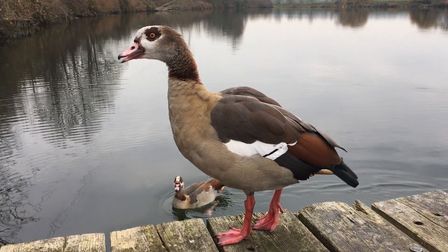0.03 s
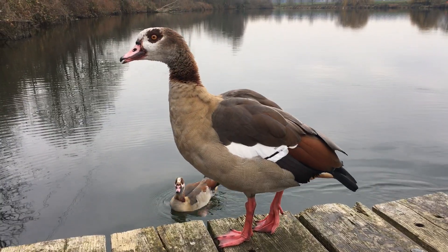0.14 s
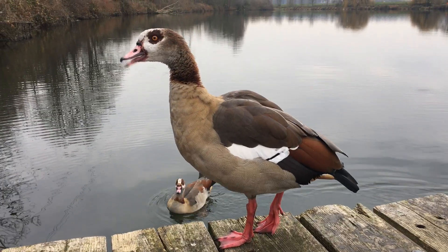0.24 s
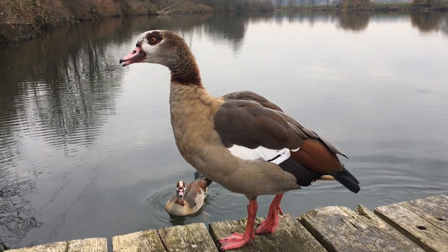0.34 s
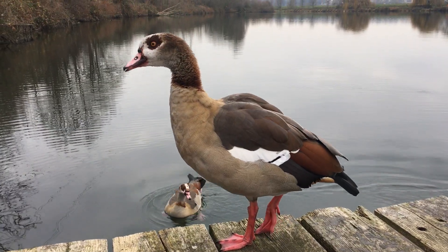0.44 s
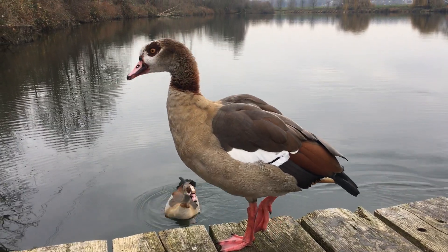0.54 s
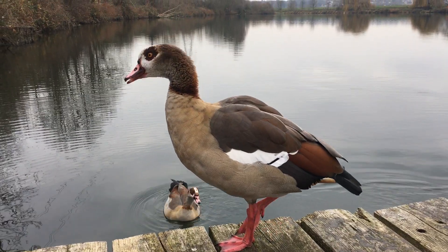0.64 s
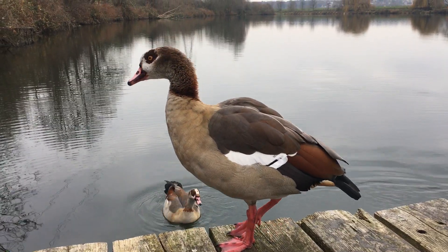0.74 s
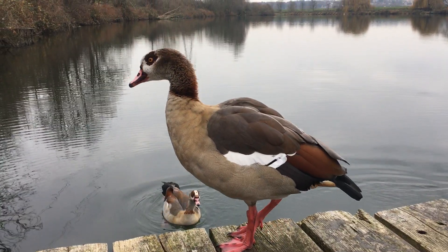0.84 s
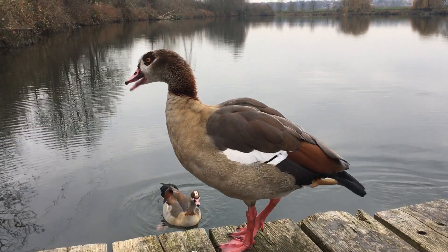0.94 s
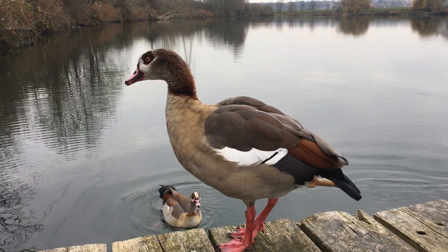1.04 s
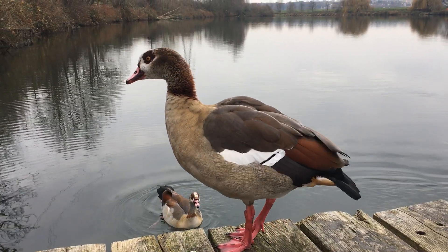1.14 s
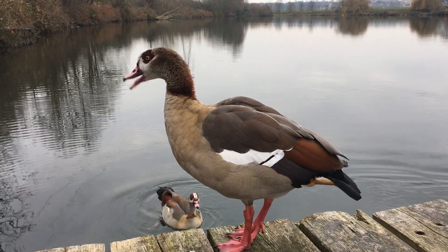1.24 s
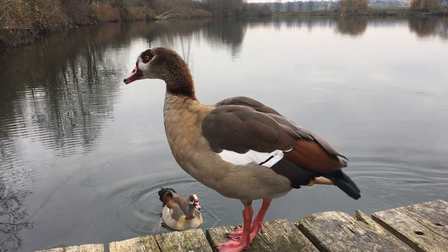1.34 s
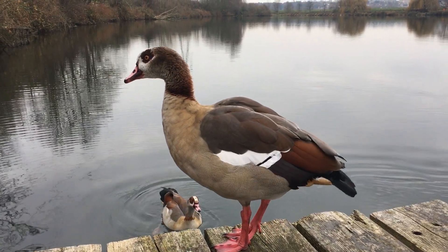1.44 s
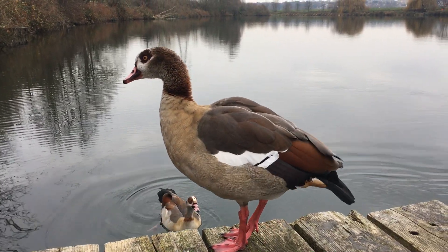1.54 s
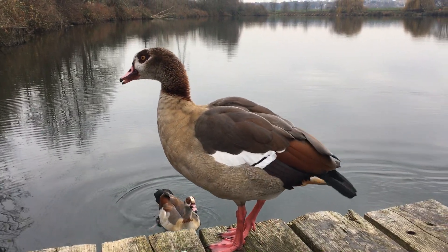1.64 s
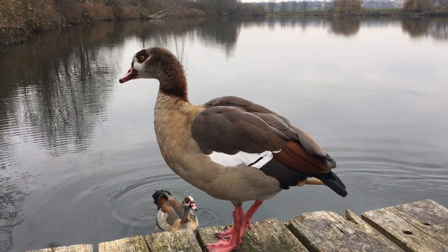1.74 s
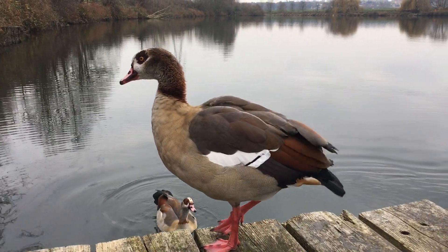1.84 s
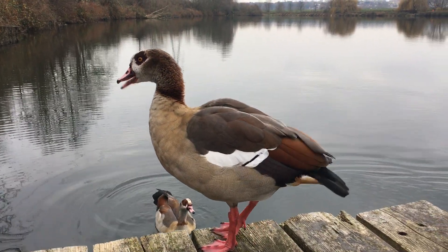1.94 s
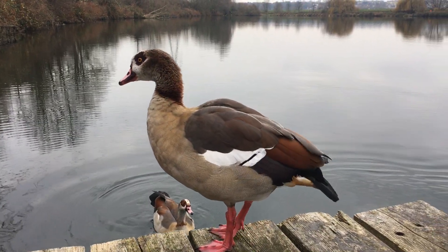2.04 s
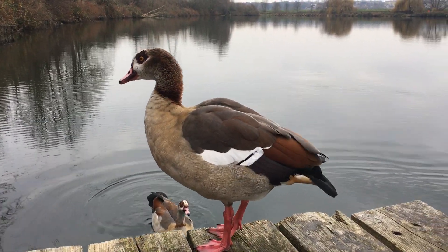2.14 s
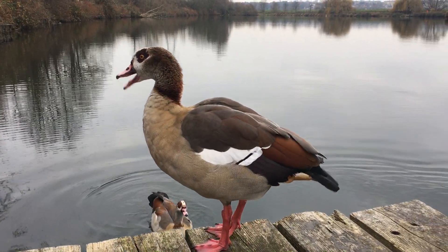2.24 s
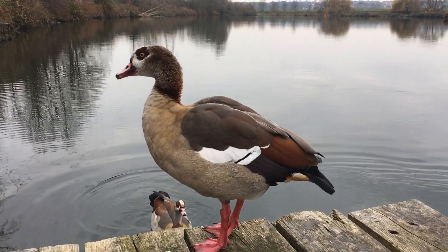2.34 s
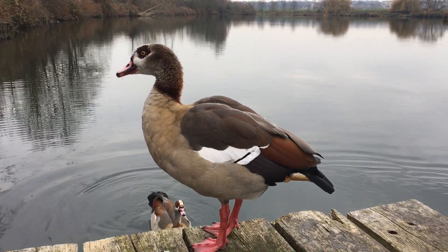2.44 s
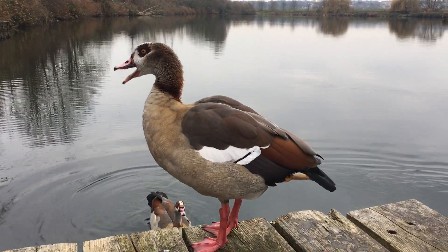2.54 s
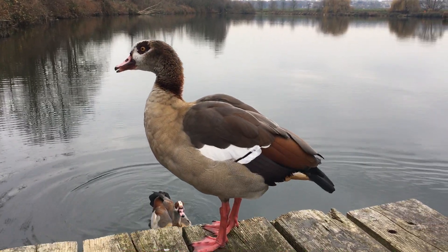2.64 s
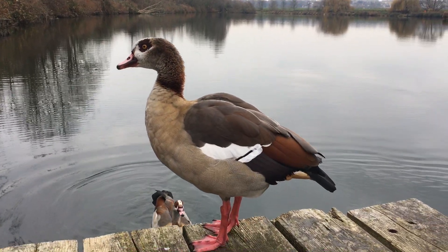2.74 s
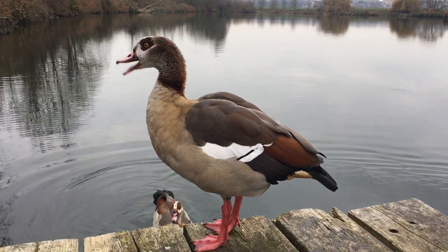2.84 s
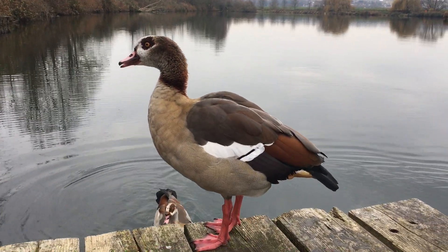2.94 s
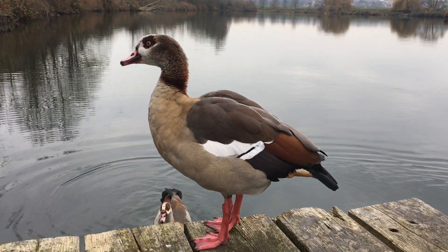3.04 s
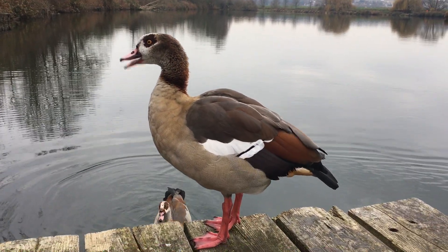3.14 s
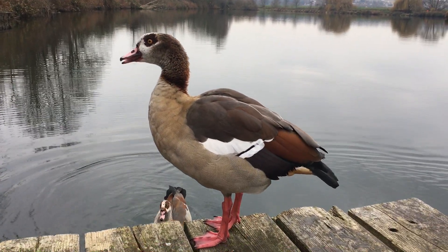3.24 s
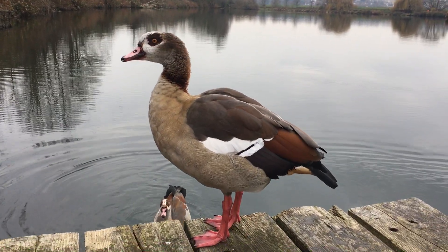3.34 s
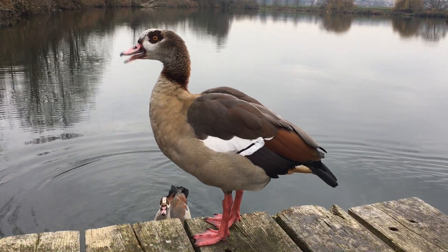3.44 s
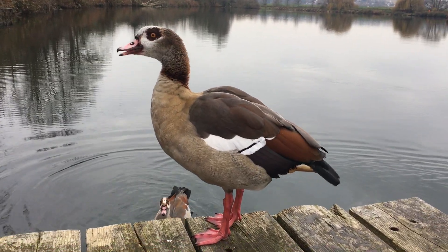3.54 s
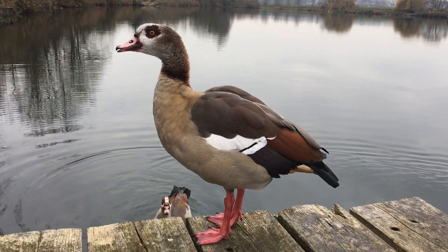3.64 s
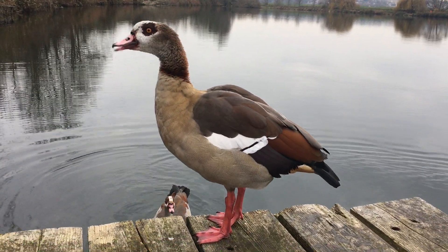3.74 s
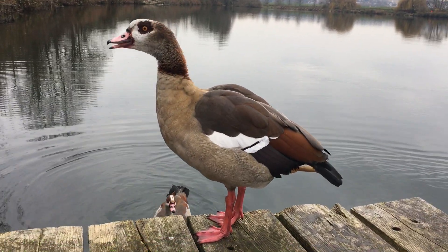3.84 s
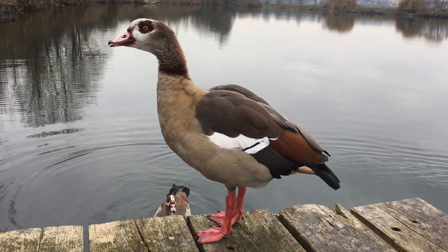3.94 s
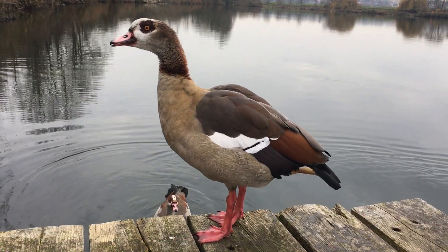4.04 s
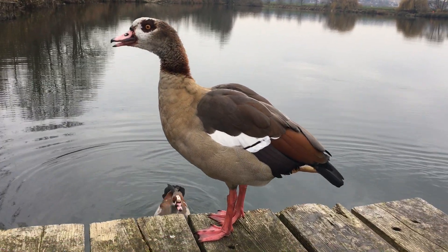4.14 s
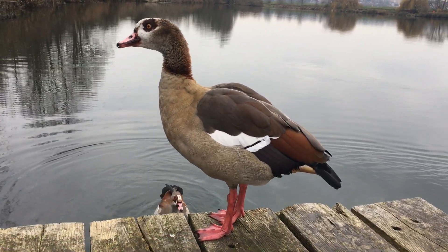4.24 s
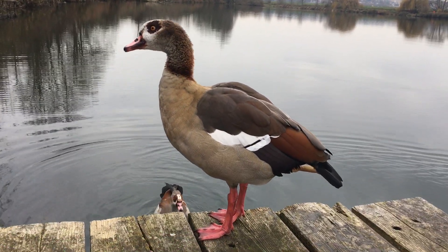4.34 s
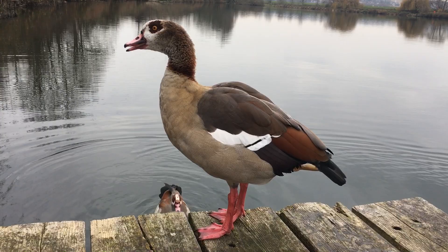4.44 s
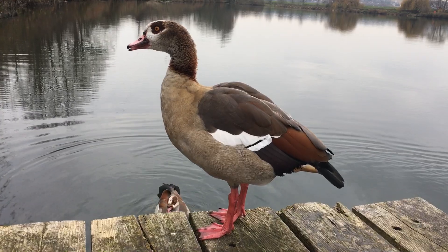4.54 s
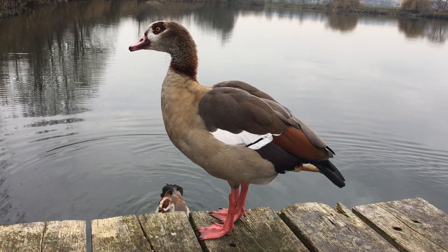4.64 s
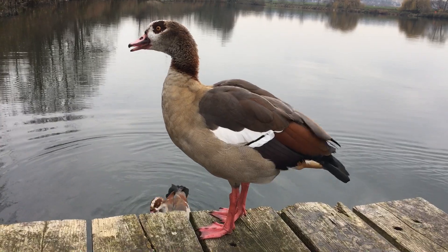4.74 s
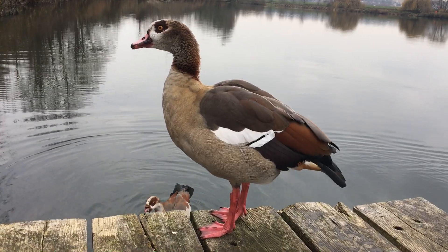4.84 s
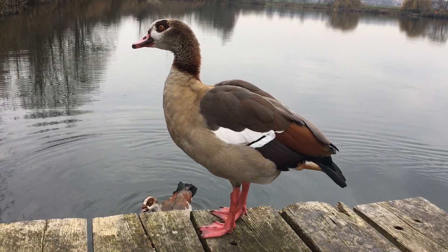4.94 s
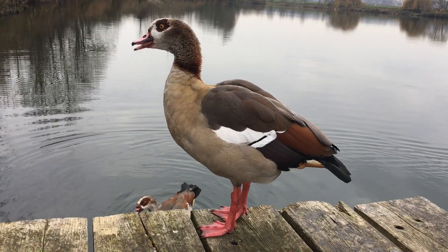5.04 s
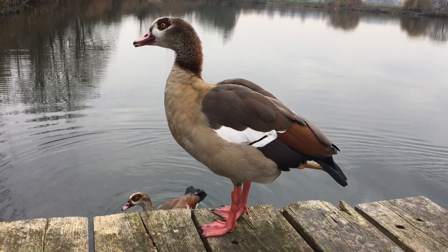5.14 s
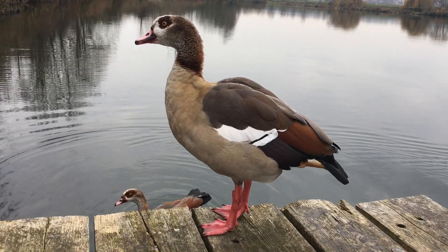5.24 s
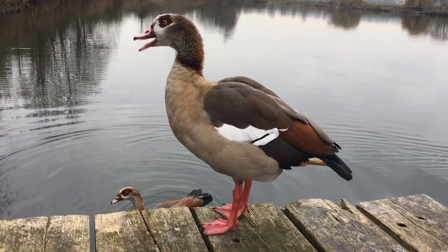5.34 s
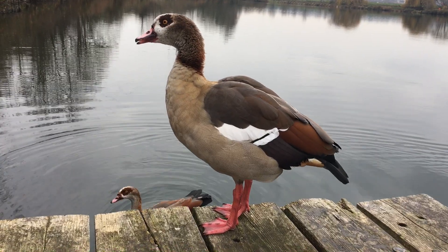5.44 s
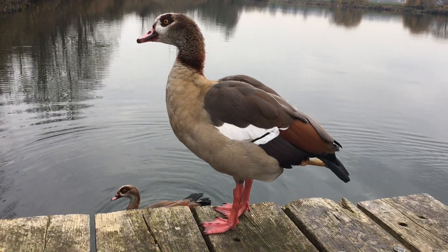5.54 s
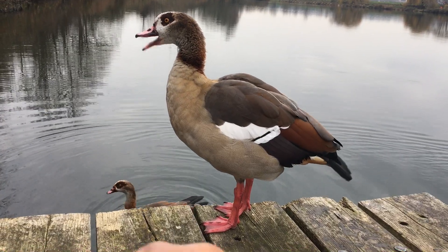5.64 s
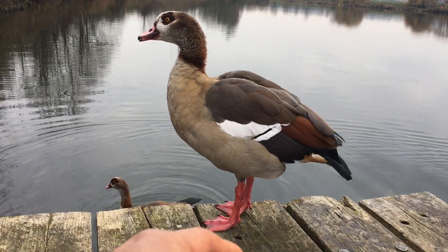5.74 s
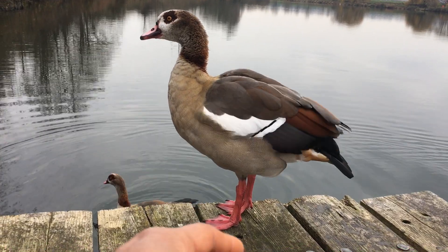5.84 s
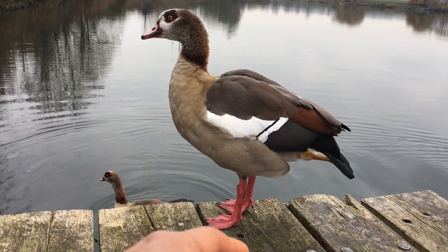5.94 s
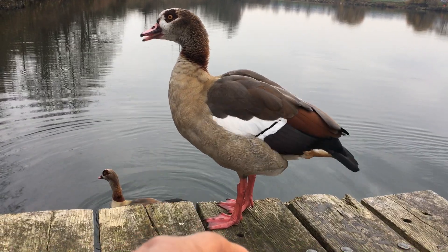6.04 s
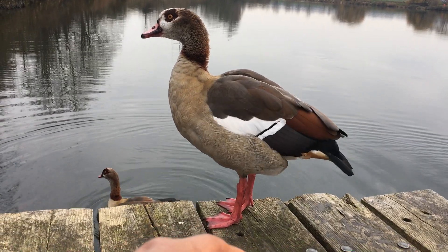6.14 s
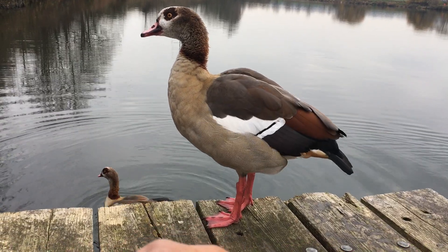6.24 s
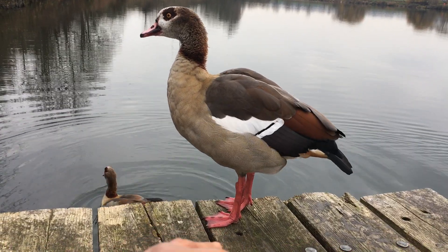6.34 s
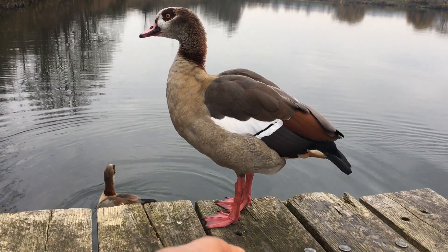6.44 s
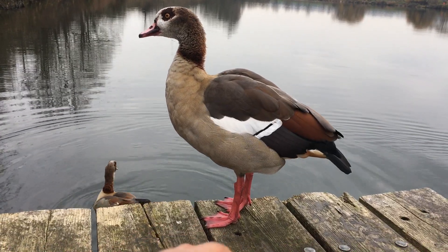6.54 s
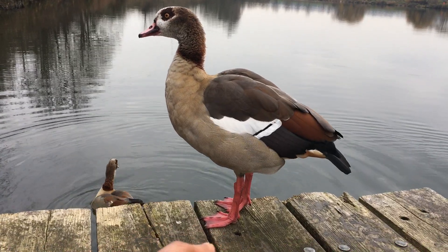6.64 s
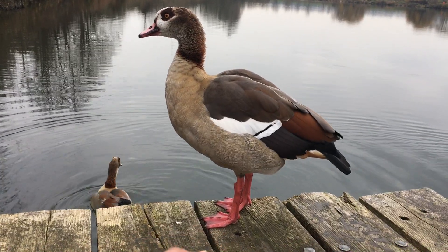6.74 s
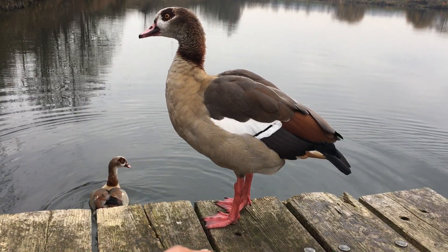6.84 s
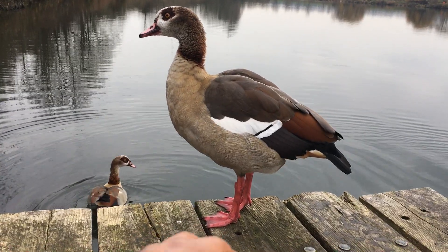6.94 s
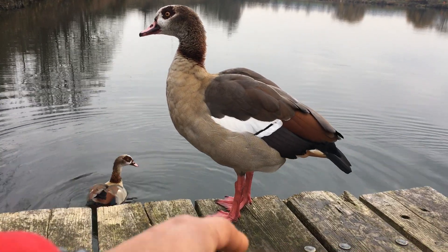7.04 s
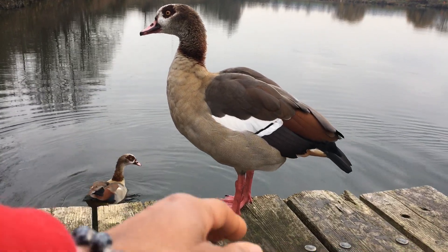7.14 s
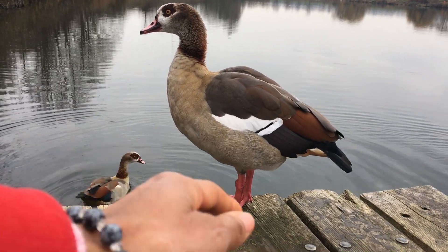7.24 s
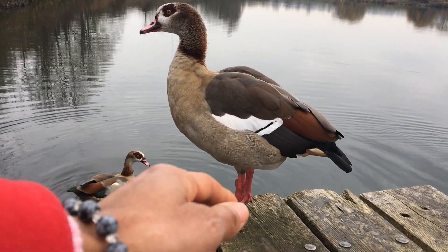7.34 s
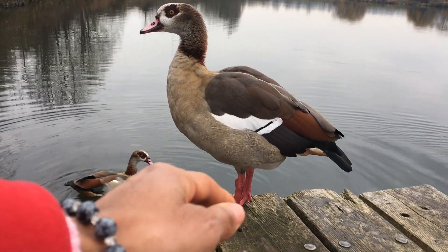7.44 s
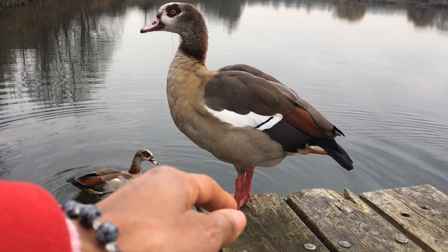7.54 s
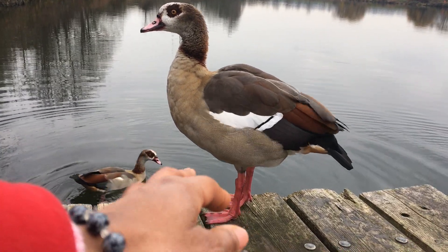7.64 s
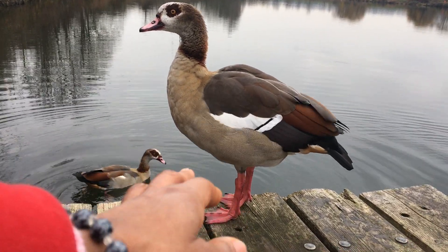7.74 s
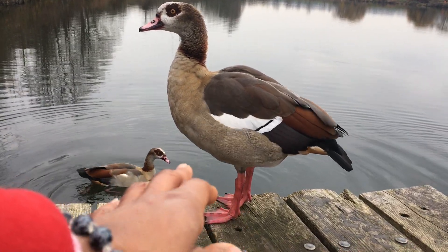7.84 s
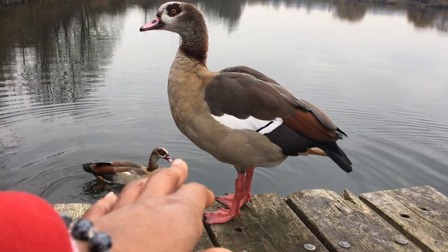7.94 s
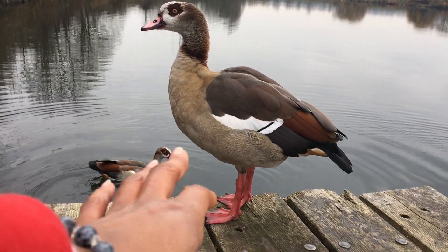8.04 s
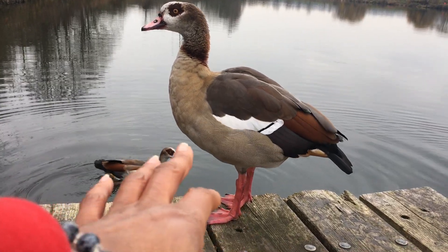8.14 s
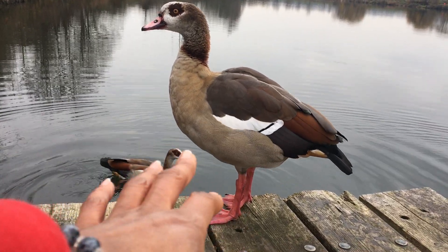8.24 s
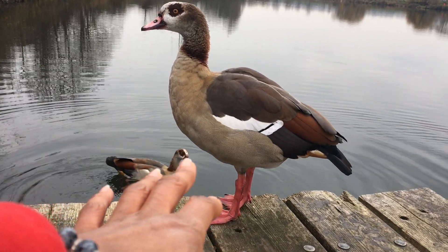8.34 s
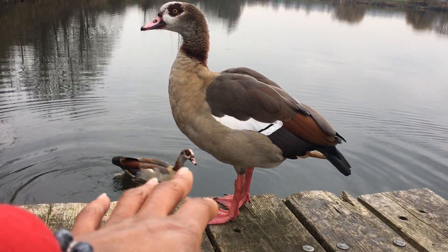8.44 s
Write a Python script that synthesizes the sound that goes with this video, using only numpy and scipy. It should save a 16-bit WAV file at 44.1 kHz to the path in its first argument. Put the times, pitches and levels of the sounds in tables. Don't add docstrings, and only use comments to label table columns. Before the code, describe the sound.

A goose standing on a wooden jetty honks close to a small camera microphone, short, harsh, nasal calls about three a second. After roughly six seconds it stops, leaving soft hiss, distant traffic rumble and a few faint waterfowl calls across the lake. A light echo from the banks follows each honk.

```python
import sys
import numpy as np
from scipy import signal
from scipy.fft import rfft, irfft, next_fast_len
from scipy.io import wavfile
from scipy.ndimage import uniform_filter1d, map_coordinates

SR = 44100
rng = np.random.default_rng(int(sys.argv[2]) if len(sys.argv) > 2 else 0)


def transcribe(u):
    v = np.clip(np.atleast_2d(u).T, -1, 1)
    q = np.round(v * 32767).astype(np.int16)
    wavfile.write(sys.argv[1], SR, q)


def elevation(decibels):
    levels = np.asarray(decibels, float)
    return 10 ** (levels / 20)


N = 374409

# frequency in Hz, level in dB per Hz.
AIR = [(12, -43), (20, -7.5), (58, -3), (399, -25), (558, -25.5), (1030, -42.5), (1260, -32.5),
       (1610, -35.5), (16000, -38)]
AIR_DB = -63.5
# frequency in Hz, level in dB per Hz.
TRAFFIC = [(100, -10), (250, -2.5), (600, -3.5), (1200, -7), (2200, -18), (4000, -38.5)]
# time in seconds, level in dB.
TRAFFIC_SWELL = [(0.0, -102), (0.16, -73), (0.68, -75.5), (0.87, -68.5), (1.09, -73), (2.41, -71.5),
                 (2.81, -69.5), (3.31, -70), (5.37, -67.5), (5.53, -73.5), (7.02, -75.5), (8.49, -72)]
# pitch in Hz, level points of time in seconds and level in dB.
MOTOR = [
    (784, [(0, -82), (2.9, -72), (3.3, -98.5)]),
    (347, [(0, -77), (1.9, -78.5), (2.3, -87.5)]),
]

# start in seconds, end in seconds, locked pitch in Hz, unsteadiness 0-1,
# strong-weak alternation in the middle 0-1.
HONKS = [(.0065, .0984, 271, .25, .15), (.3165, .4075, 274, .3, .4), (.6335, .723, 275, .3, .1),
         (.965, 1.0561, 273, .35, 0), (1.3138, 1.3997, 273, .55, .2), (1.6375, 1.7245, 273, .3, .15),
         (1.9664, 2.0559, 274, .2, .1), (2.2835, 2.3716, 282, .45, 0), (2.5936, 2.6838, 279, .25, 0),
         (2.9071, 2.9998, 278, .4, .25), (3.2147, 3.3005, 279, .35, 0), (3.5192, 3.6074, 278, .25, .35),
         (3.8246, 3.9183, 270, .45, .3), (4.1322, 4.2254, 275, .15, .1), (4.435, 4.5249, 273, .5, .15),
         (4.74, 4.8388, 279, .15, .45), (5.0523, 5.1479, 280, .15, .2), (5.3766, 5.4693, 277, .1, .45),
         (5.7031, 5.7938, 278, .12, .2), (6.0595, 6.1465, 273, .25, .1)]
# beak opening in dB, rasp in dB, hiss in dB,
# lean of the beak modes and of the throat modes to the high side in dB per octave.
POSE = [(4, 3.5, 0.5, -14.5, 0.5), (3.5, 3, 0.4, -10.5, -0.5), (0.5, -2.5, -2, 0, -2),
        (-0.2, 2, -2, -0.5, -2), (-2, -0.3, -4.5, 0, -1.5), (-3, -1, -4.5, 1, -4.5),
        (-2, 0.6, -4.5, 4.5, -2), (-2.5, 0.8, -3, 4.5, -1.5), (-1.8, 1.3, -3.3, 5, -3),
        (-4, 0.3, -0.3, 4.5, -0.5), (0.2, 1, -0.3, 0, -3), (3, 2.5, 3, -6, -2), (1.5, 2.5, 2, -8.5, -1.2),
        (2, 2, 2, -8, -2.5), (1.2, -1, -2, -3.5, -3.5), (-1.1, -0.9, -2, 3, -3), (1, -0.2, -1.5, -3.5, -4),
        (1, -0.1, 3, -1, -2), (0.9, .1, 0.7, -4.5, -4), (-0.7, -0.5, -1, -3, -3.5)]
# seconds after the start, share of the locked pitch.
ONSET = [(0, .6), (.011, .67), (.017, .95), (.027, 1.005)]
# seconds before the end, pitch drop as a share.
OFFSET = [(.06, -.012), (.04, -.008), (.028, .04), (0, .27)]
# share of the honk gone by,
# then beak, rasp and hiss over the windpipe in dB.
GAPE = [(0, -6, -15.5, -28), (.15, 8, -5.5, -18), (.4, 2, -6, -15.5), (.75, -7, -10.5, -24.5),
        (1, -9, -18, -27.5)]
# seconds before the end, share shut.
CLOSING = [(0.054, 0), (.005, 1)]
# centre in Hz, width in Hz, level in dB.
WINDPIPE = [(171, 37, -7.5), (324, 150, -9.5), (696, 71, -18.5), (751.6, 120, -3), (1153, 134, 6)]
BEAK = [(1611, 227, 2), (2097, 304, 0.5)]
THROAT = [(2744, 232, -3), (3400, 250, -4), (4157, 357, 1), (4898, 340, -0.5), (5512, 435, -1),
          (6910, 450, -8.5)]
NOSTRILS = [(7501, 700, -0.5), (9070, 1200, 0), (10630, 840, -0.5), (11870, 900, -1), (13340, 1400, -2),
            (15360, 1500, -5.5)]
# centre in Hz, width in Hz, depth in dB.
AIR_SACS = [(490, 170, -14), (1400, 120, -5), (2480, 200, -5)]
SINKING_HZ = (500, 1000)
# windpipe, beak, throat and nostrils in dB.
FLUTTER_DB = (.8, 2, 2, 3)

LOUD_DB, ATTACK_S, ATTACK_DB, SWELL_S, SWELL_DB = -31, 0.013, 17, .048, 3.5
RELEASE_S, RELEASE_DB, FADE_S, FADE_DB = .03, 3.5, 0.0091, 16.5
LAST_TWIN, TWIN_GROWS = .33, .6
THROAT_SHIFT, SHUT_LEAN_DB = 1.0036, 2
NOSTRIL_SPREAD, NOSTRIL_DB = .015, 1.2
FACING, FACING_HZ = .5, 10900
ROUGH_LOSS_DB = 2.5

# frequency in Hz, time to fall 60 dB in seconds.
BANK_DECAY = [(300, 0.6), (1200, 0.25), (4500, 0.31), (9000, 0.14)]
STIR_S = .004

# start in seconds, length in seconds, first pitch in Hz, last pitch in Hz,
# level in dB, brightness in dB per overtone.
FAR_CALLS = [
    (3.73, .12, 560, 550, -70, -12),
    (5.2, .14, 560, 640, -74, -4),
    (7.01, .08, 870, 930, -75, -14),
    (7.105, .04, 700, 710, -74, -1),
    (7.035, .035, 2110, 2110, -80, -30),
    (7.54, .05, 2110, 2110, -79, -30),
    (7.54, .04, 1500, 1500, -80, -30),
    (8.42, .05, 2110, 2110, -79, -30),
    (1.83, .07, 5700, 5700, -81, -30),
]
TRILLS = [
    (.765, .085, 1290, 1200, -61, -13),
    (.845, .04, 1220, 950, -68, -4),
]
# start in seconds, length in seconds, pitch in Hz, list of overtones in dB, level in dB.
REPLY = (7.127, .045, 537, [-7, 0, -10, -30, -32], -60)
# delay in seconds, level in dB.
SHORES = [(.055, -9), (.098, -10), (.14, -17), (.18, -19), (.26, -20)]
# time in seconds, level in dB.
RATTLE = [
    (7.0, -82),
    (7.09, -78),
    (7.12, -67),
    (7.2, -73),
    (7.32, -88),
]

# time in seconds, level in dB.
TICK = (1.626, -50)
TOP_HZ = 15850


def unit(x):
    return x / np.sqrt(np.mean(x ** 2) + 1e-20)


def along(points, hz):
    f, v = np.transpose(points)
    return np.interp(np.log(hz + 1), np.log(f + 1), v)


def over(points, t):
    s, v = np.transpose(sorted(points))
    return np.interp(t, s, v)


def wobble(rate):
    knots = rng.standard_normal(int(N * rate / SR) + 4)
    return map_coordinates(knots, [np.arange(N) * rate / SR])


def filtered(x, response):
    m = next_fast_len(len(x) + SR // 10)
    return irfft(rfft(x, m) * response(np.fft.rfftfreq(m, 1 / SR)), m)[:len(x)]


def noise(spectrum):
    return unit(filtered(rng.standard_normal(N), lambda hz: elevation(along(spectrum, hz))))


def background():
    t = np.arange(N) / SR
    hum = np.zeros(N)
    for hz, level in MOTOR:
        strength = elevation(over(level, t) + 2.8 * wobble(13))
        hum += strength * np.sin(2 * np.pi * hz * t + 0.29 * wobble(23))
    traffic = elevation(over(TRAFFIC_SWELL, t) - 3.0 + 0.86 * wobble(2.7)) * noise(TRAFFIC)
    air = elevation(AIR_DB + .4 * wobble(3.5)) * noise(AIR)
    return air + traffic + hum


def resonate(x, modes, shift=1, lean_db=0, order=1):
    c, w, db = np.transpose(modes)[:, :, None]
    w = np.maximum(w, c / 24)
    sign = (-1.) ** np.arange(len(c))[:, None]
    gain = sign * elevation(db + lean_db * np.log2(c / c[0]))

    def response(f):
        ring = gain * 1j * f * w / ((shift * c) ** 2 - f * f + 1j * f * w)
        r = np.sum(ring, axis=0) ** order
        return r / np.sqrt(np.mean(np.abs(r) ** 2))
    return filtered(x, response)


def notched(x, dips):
    def dip(f, c, w, db):
        return (c * c - f * f + 1j * f * w * elevation(db)) / (c * c - f * f + 1j * f * w)
    return filtered(x, lambda f: np.prod([dip(f, *row) for row in dips], axis=0))


def slaps(honk, jitter=.045, scatter_db=3.5, limp=.12):
    start, end, hz, rough, middle = honk
    last = LAST_TWIN + TWIN_GROWS * middle
    t = np.arange(start, end - .005, 1 / SR)
    drop = over(OFFSET, end - t) * (1 - .8 * last)
    rate = hz * over(ONSET, t - start) * (1 - drop)
    cycle = np.cumsum(rate) / SR
    k = np.arange(int(cycle[-1]) + 1)
    at = np.interp(k, cycle, t)
    period = 1 / np.interp(at, t, rate)
    luck = rng.standard_normal((40, 2))[:len(k)]
    twin = np.interp(at, [start + .02, start + .035, end - .04, end - .022], [0, middle, middle, last])
    loose = rough + np.interp(at, [start + .012, start + .025, end - .04, end - .02], [.3, 0, 0, .3])
    odd = (-1.) ** (k - k[-1])
    stray = jitter * loose * luck[:, 0] * (k > 0)
    at = at + period * (stray + limp * twin * (odd - 1) / 2)
    size = (1 + twin * odd) / np.sqrt(1 + twin ** 2) * elevation(scatter_db * loose * luck[:, 1])
    return at, size * np.sqrt(period * SR), loose


def cavity_levels(honk, pose, at):
    start, end = honk[:2]
    rise = over([(0, -ATTACK_DB), (ATTACK_S, -SWELL_DB), (SWELL_S, 0)], at - start)
    release = [(0, -FADE_DB), (FADE_S, -RELEASE_DB - FADE_DB / 3),
               (RELEASE_S, -RELEASE_DB / 3), (2 * RELEASE_S, 0)]
    fall = over(release, end - at)
    share, *colours = np.transpose(GAPE)
    gone_by = (at - start) / (end - start)
    lift = [np.interp(gone_by, share, c) + db for c, db in zip(colours, pose)]
    pipe = 0 * at - ROUGH_LOSS_DB * honk[3]
    drift = uniform_filter1d(rng.standard_normal((40, 4)), size=3, axis=0)
    flutter = unit(drift)[:len(at)] * FLUTTER_DB
    return LOUD_DB + rise + fall + np.array([pipe] + lift) + flutter.T


def turned_nostrils(hiss_db):
    modes = []
    for (c, w, db), (a, b) in zip(NOSTRILS, rng.standard_normal((len(NOSTRILS), 2))):
        facing_db = FACING * hiss_db * np.exp(-(c / FACING_HZ - 1) ** 2 * 60)
        modes.append((c * (1 + NOSTRIL_SPREAD * a), w, db + NOSTRIL_DB * b + facing_db))
    return modes


def honk_sound(honk, pose, breath=.48, murk=.36, puff_s=.003, lag_s=.0018, shut=.86):
    at, size, loose = slaps(honk)
    nostrils = turned_nostrils(pose[2])
    n = SR // 6
    t = honk[0] + (np.arange(n) - 8) / SR
    spot = (at - t[0]) * SR
    index = spot.astype(int)[:, None] - 7 + np.arange(16)
    kernel = np.sinc(index - spot[:, None]) * np.hanning(18)[1:-1]
    puff = np.exp(-np.arange(SR // 100) / SR / puff_s)
    puff = puff / np.linalg.norm(puff)
    murky = np.clip(murk * np.interp(t, at, loose), 0, .9)
    airy = min(breath, .99)
    closing = over(CLOSING, honk[1] - t)
    cavities = [(murky, WINDPIPE, 1, 0, 0, 1),
                (murky, BEAK, 1, pose[3], SHUT_LEAN_DB, 2),
                (airy, THROAT, THROAT_SHIFT, pose[4], 0, 2),
                (airy, nostrils, 1, 0, 0, 2)]
    parts = []
    for db, (mix, modes, shift, lean, shut_lean, passes) in zip(cavity_levels(honk, pose, at), cavities):
        strength = size * elevation(db)
        strength[0] *= elevation(-12 * (passes - 1))
        train = np.bincount(index.ravel(), (kernel * strength[:, None]).ravel(), n)
        gust = signal.fftconvolve(np.abs(train), puff)[:n] * rng.standard_normal(n)
        drive = np.sqrt(1 - mix ** 2) * train + mix * gust
        sunk = [(c * shut ** (SINKING_HZ[0] < c < SINKING_HZ[1]), *rest) for c, *rest in modes]
        gaping = resonate((1 - closing) * drive, modes, shift, lean, order=passes)
        shutting = resonate(closing * drive, sunk, shift, lean + shut_lean, order=passes)
        parts.append(gaping + shutting)
    pipe, beak, rasp, hiss = parts
    late_beak = filtered(beak, lambda hz: np.exp(-2j * np.pi * hz * lag_s))
    body = notched(elevation(2.0) * pipe + elevation(-1.0) * late_beak, AIR_SACS)
    body = filtered(body, lambda hz: 1 / (1 + 1j * hz / 2600) ** 2)
    return body + elevation(-2.0) * rasp + elevation(-2.5) * hiss


def goose():
    out = np.zeros(N)
    for honk, pose in zip(HONKS, POSE):
        sound = honk_sound(honk, pose)
        out[round(honk[0] * SR) - 8:][:len(sound)] += sound
    return out


def echo(x, t60, seconds=.6):
    hz, t, z = signal.stft(rng.standard_normal(int(seconds * SR)), SR, nperseg=256)
    tail = signal.istft(z * elevation(-60 * t / along(t60, hz)[:, None]), SR, nperseg=256)[1]
    return signal.fftconvolve(x, tail / np.linalg.norm(tail))


def banks(x, delay_s=.012, far_s=0.093, far_db=-14, far_t60=1.5):
    out = np.zeros(N + 2 * SR)
    for start, end, *_ in HONKS:
        first = int(start * SR)
        call = x[first:int((end + .02) * SR)]
        call = call * unit(uniform_filter1d(rng.standard_normal(len(call)), size=int(STIR_S * SR)))
        back = echo(call, BANK_DECAY)
        shore = elevation(far_db) * echo(call, [(1000, far_t60), (5000, 0.99 * far_t60)], seconds=.9)
        out[first + int(delay_s * SR):][:len(back)] += back
        out[first + int(far_s * SR):][:len(shore)] += shore
    return out[:N]


def far_calls():
    out = np.zeros(N + SR)
    for calls, trill in ((FAR_CALLS, 0), (TRILLS, .035)):
        for s, length, hz0, hz1, db, tilt_db in calls:
            t = np.arange(int(length * SR)) / SR
            hz = np.linspace(hz0, hz1, len(t)) * (1 + trill * np.cos(2 * np.pi * 30 * t))
            turn = 2 * np.pi * np.cumsum(hz) / SR
            call = sum(elevation(tilt_db * k) * np.sin((k + 1) * turn) for k in range(2))
            out[int(s * SR):][:len(t)] += elevation(db + 3) * call * np.sqrt(np.sin(np.pi * t / length))
    return out[:N]


def far_goose():
    out = np.zeros(N + SR)
    s, length, hz, overtones_db, db = REPLY
    t = np.arange(int(length * SR)) / SR
    hoarse = 1 + .25 * unit(uniform_filter1d(rng.standard_normal(len(t)), size=60))
    voice = sum(elevation(v) * np.sin(2 * np.pi * hz * (k + 1) * t) for k, v in enumerate(overtones_db))
    call = elevation(db + 3) * hoarse * voice * np.sqrt(np.sin(np.pi * t / length))
    for delay, echo_db in [(0.0013, 0.0055)] + SHORES:
        out[int((s + delay) * SR):][:len(t)] += elevation(echo_db) * call
    rattle = noise([(300, -27.5), (550, -3.5), (1400, 1.5), (1750, -7.5), (2300, -23.5)])
    level = over([(0, -140)] + RATTLE + [(7.6, -140)], np.arange(N) / SR)
    return out[:N] + elevation(level) * rattle


def beak_tick():
    burst, t = np.zeros(N), np.arange(300) / SR
    burst[int(TICK[0] * SR):][:300] = elevation(TICK[1] - 60 * t / .006) * rng.standard_normal(300)
    return filtered(burst, lambda hz: (1j * hz / 5000 / (1 + 1j * hz / 5000)) ** 3)


def scene():
    bird = goose()
    near = bird + elevation(-26.5) * banks(bird) + beak_tick()
    return (near + far_calls() + far_goose() + background())[None]


def low_pass(x):
    return signal.sosfilt(signal.butter(12, 16400, fs=SR, output="sos"), x)


def record(dry):
    mix = filtered(dry[0], lambda hz: hz < TOP_HZ)[None]
    return low_pass(mix)


dry = scene()
out = record(dry)
transcribe(out)
```